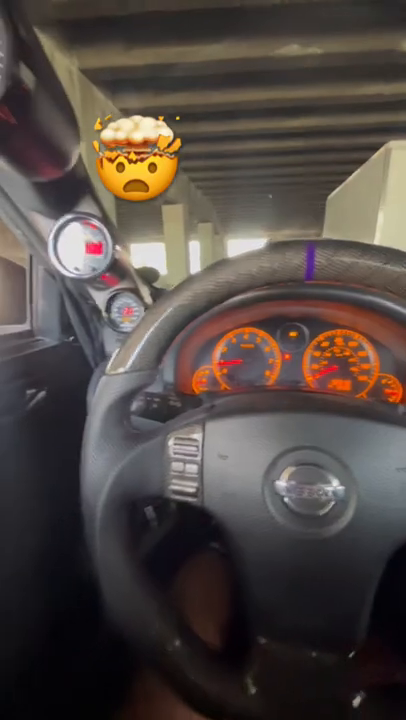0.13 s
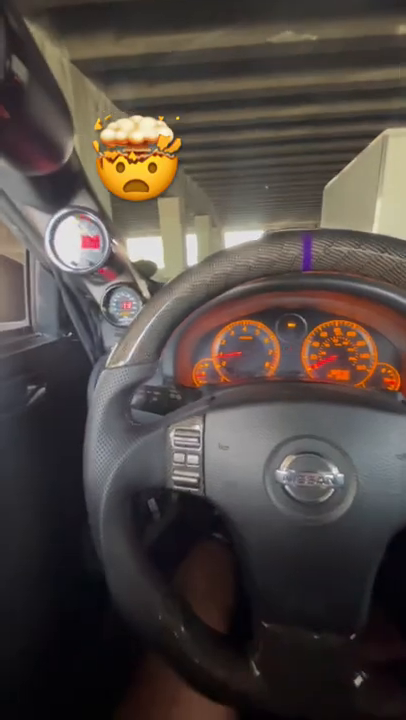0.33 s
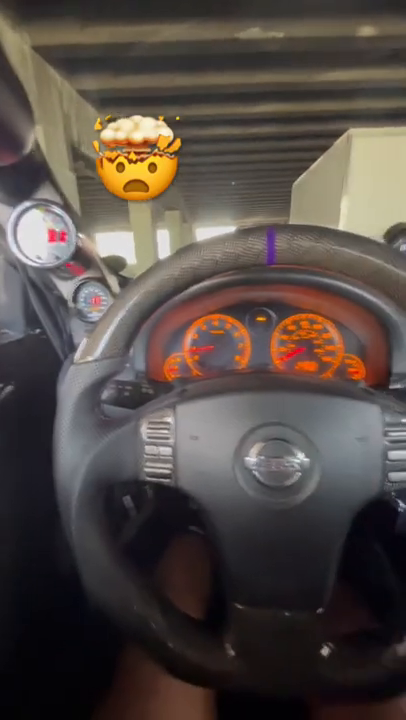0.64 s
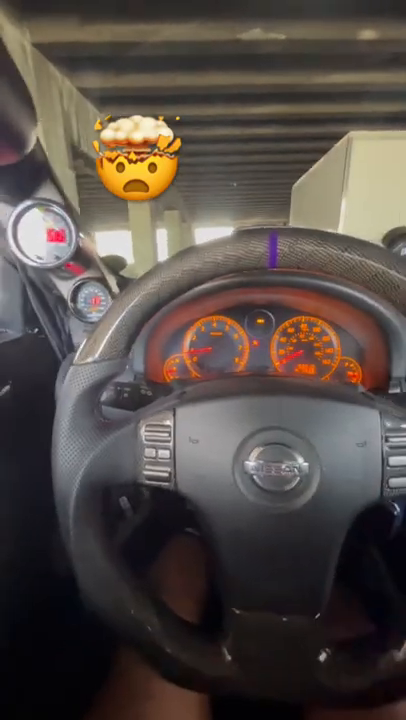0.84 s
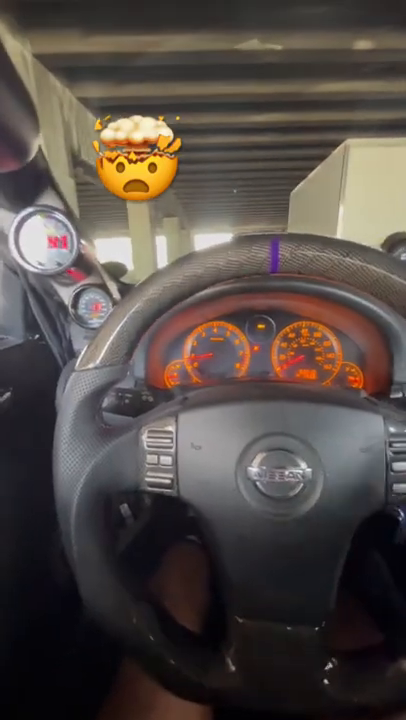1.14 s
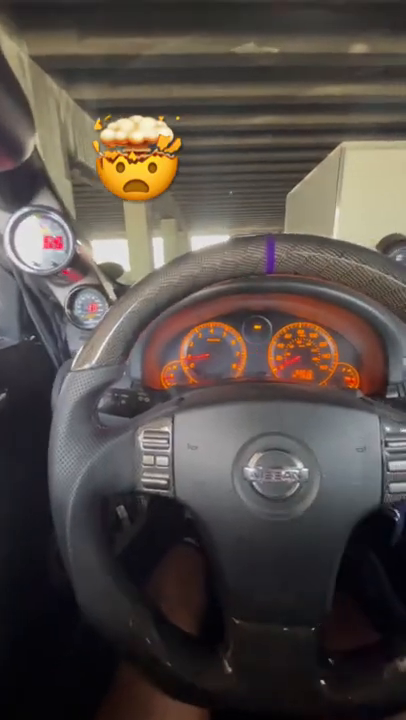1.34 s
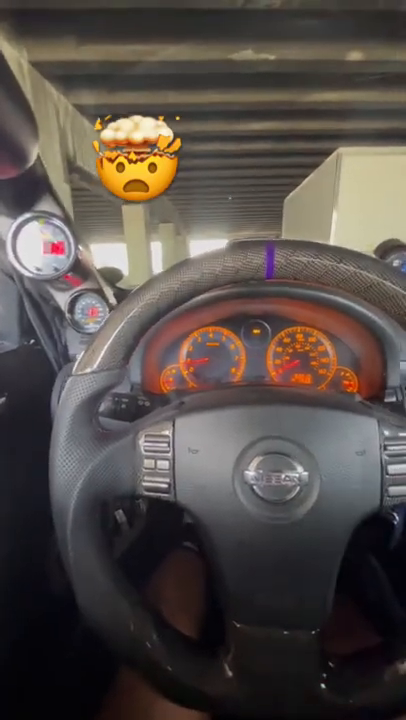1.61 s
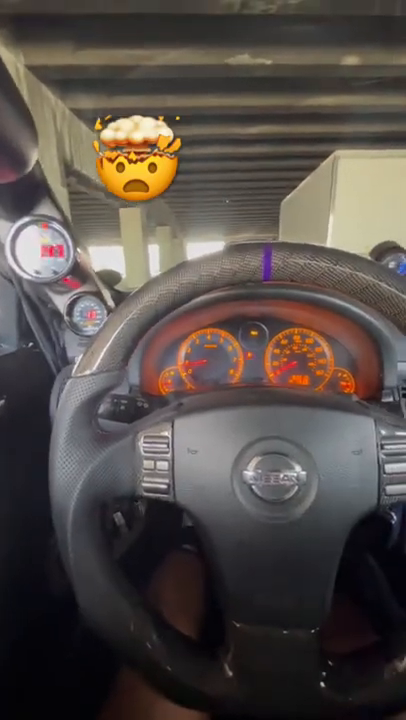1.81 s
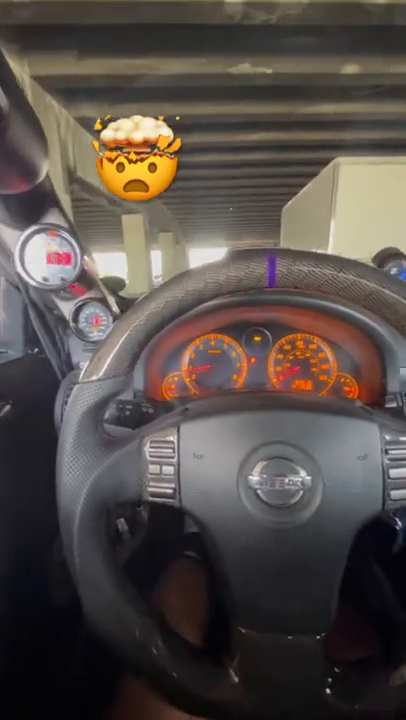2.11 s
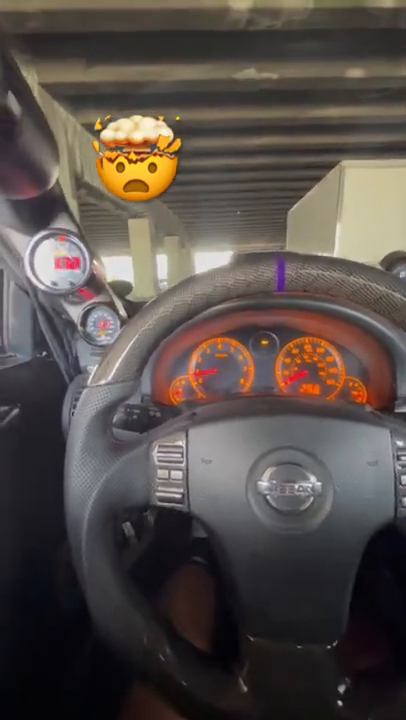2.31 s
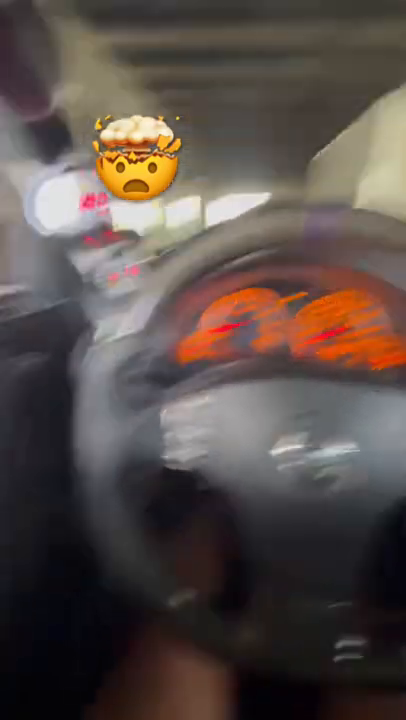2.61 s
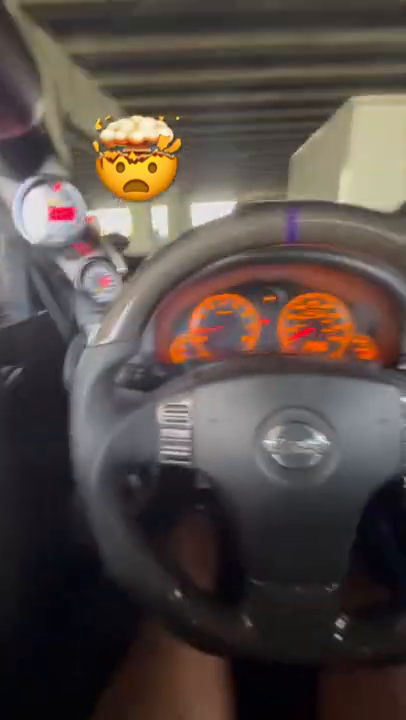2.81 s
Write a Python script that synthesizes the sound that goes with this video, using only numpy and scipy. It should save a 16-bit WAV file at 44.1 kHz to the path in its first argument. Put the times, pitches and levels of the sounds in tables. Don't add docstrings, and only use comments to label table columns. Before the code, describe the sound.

A car engine idles inside the cabin, cutting in abruptly at 0.04 seconds. Its low, resonant boom pulses unevenly, strongest near 0.6, 0.9 and 1.4, over another engine's even hum, throbbing panel rumble and soft fan roar. A barely audible bright puff leaks at 1.7. At 2.34 a turbo valve releases a brief whistling hiss, fading quickly as roar and a faint intake howl rise until the end.

```python
import sys
import numpy as np
from scipy import signal
from scipy.fft import rfft, irfft
from scipy.io import wavfile

SR = 44100
rng = np.random.default_rng(int(sys.argv[2]) if len(sys.argv) > 2 else 0)


def magnitude_from_level(level_db):
    exponent = np.asarray(level_db, float) / 20
    return 10 ** exponent


def wav_record(signal):
    frames = np.transpose(np.atleast_2d(signal))
    bounded = np.clip(frames, -1, 1)
    quanta = np.round(bounded * 32767).astype(np.int16)
    wavfile.write(sys.argv[1], SR, quanta)


N = 130095
T = np.arange(N) / SR
HZ = np.maximum(np.arange(N // 2 + 1) * SR / N, 1)

CRANK_HZ = 12.16
VALVE_OPEN_S, BURST_S = .03, 2.34

# start_s, pitch_hz, level_db
CABIN_BOOM = [(.05, 138, -19), (.17, 137, -16), (.3, 132, -24), (.4, 131, -18), (.52, 129.8, -22),
              (.575, 129.3, -11.5), (.68, 131, -26), (.74, 130, -15), (.92, 129.6, -13), (1.06, 130, -23),
              (1.2, 129, -17), (1.44, 128.9, -12.5), (1.58, 127.5, -25), (1.68, 128.5, -15),
              (1.84, 130, -21), (2.04, 130, -22), (2.1, 131.5, -16), (2.95, 132.7, -17)]


def rms_one(x):
    return x / np.sqrt(np.mean(x ** 2) + 1e-20)


def at_hz(points):
    hz, value = np.transpose(points)
    return np.interp(np.log(HZ), np.log(hz), value)


def in_time(rows):
    s, *columns = np.transpose(rows)
    return [np.interp(T, s, c) for c in columns]


def drift(rate_hz):
    pole = np.exp(-80 * np.pi * rate_hz / SR)
    steps = rng.standard_normal(N // 40 + 2002)
    slow = signal.lfilter([1], [1, -2 * pole, pole * pole], steps)[2000:]
    slow = rms_one(slow - slow.mean())
    return np.interp(np.arange(N) / 40, np.arange(len(slow)), slow)


def noise(gain):
    white = rng.standard_normal((2, N))
    return rms_one(irfft(rfft(white) * gain, N))


def colour(points):
    low_cut = 1 + (points[0][0] / HZ) ** 4
    high_cut = 1 + (HZ / points[-1][0]) ** 12
    return magnitude_from_level(at_hz(points)) / low_cut / high_cut


def peak(hz, width_hz):
    return 1 / (1 + (2 * (HZ - hz) / width_hz) ** 2)


def fade_in(start_s, rise_s):
    return np.clip((T - start_s) / rise_s, 0, 1)


def firing():
    return np.cumsum(in_time(CABIN_BOOM)[0] / 3) / SR


def orders(turns, table):
    total = 0
    for multiple, level_db in table:
        level = np.sqrt(2) * magnitude_from_level(level_db + 3 * np.tanh(drift(3)))
        phase = rng.uniform(0, 7) + .4 * drift(3)
        total = total + level * np.sin(2 * np.pi * multiple * turns + phase)
    return total


def own_engine():
    # firing_multiple, level_db
    own_orders = [(1, -39.5), (1.26, -40.5), (1.5, -46.5), (1.85, -38.5), (2, -29), (5, -42.5)]
    boom_level = np.sqrt(2) * magnitude_from_level(in_time(CABIN_BOOM)[1] + drift(8))
    return boom_level * np.sin(2 * np.pi * 3 * firing()) + orders(firing(), own_orders)


def even_engine():
    # crank_multiple, level_db
    even_orders = [(2.92, -31.5), (5, -35.5), (6, -25), (8, -37.5), (9, -38.5), (10, -31.5), (12, -34.5),
                   (14, -39), (16, -37), (18, -52), (21, -40.5)]
    return orders(CRANK_HZ * T, even_orders)


def throb():
    firing_throb_db = 3 * np.sin(2 * np.pi * firing())
    crank_throb_db = .5 * np.sin(2 * np.pi * CRANK_HZ * T)
    return firing_throb_db + crank_throb_db


def panel_rumble():
    # pitch_hz, density_db (per Hz)
    rumble_colour = [(26, -21.5), (34, -0.5), (70, -2), (103, -9.5), (135, -6), (160, -8), (260, -15.5),
                     (420, -23)]
    return magnitude_from_level(-24.5 + throb()) * noise(colour(rumble_colour))


def fan_roar():
    # pitch_hz, density_db (per Hz)
    roar_colour = [(260, -3), (420, 0.5), (800, -8), (1700, -11), (3100, -10.5), (4200, -15), (8500, -35.5),
                   (13800, -48)]
    # pitch_hz, width_hz, level_db
    resonances = [(965, 154, -43), (2616, 320, -45), (5870, 1500, -52), (369, 46, -46)]
    # start_s, swell_db
    load = [
        (0, 2),
        (.4, 0.5),
        (1.8, 0.5),
        (2.3, 2.5),
        (2.7, 3),
        (2.95, 2),
    ]
    air = magnitude_from_level(-35 + .58 * drift(4.4) + .6 * drift(25)) * noise(colour(roar_colour))
    for hz, width_hz, level_db in resonances:
        air = air + magnitude_from_level(level_db) * noise(peak(hz, width_hz))
    load_db, = in_time(load)
    return magnitude_from_level(load_db + .19 * throb()) * air


def whines():
    # pitch_hz, level_db
    tones = [(445.5, -48), (340.5, -51), (412, -57), (2310, -48.5), (1377, -43.5)]
    # start_s, rise_s
    starts = [(-.5, .1), (-.5, .1), (-.5, .1), (2.25, .1), (2.77, .1)]
    total = 0
    for (hz, level_db), (start_s, rise_s) in zip(tones, starts):
        level = np.sqrt(2) * magnitude_from_level(level_db + 3.4 * drift(9.9)) * fade_in(start_s, rise_s)
        total = total + level * np.sin(2 * np.pi * hz * T + .89 * drift(2.8))
    return total


def release(start_s, opening_s, level_db, fall_db_per_s):
    bleeding_s = np.maximum(T - start_s - opening_s - .07, 0)
    return magnitude_from_level(level_db - fall_db_per_s * bleeding_s) * fade_in(start_s, opening_s)


def valve_puff():
    # level_db, fall_db_per_s
    puff = (-59.5, 70)
    # pitch_hz, density_db (per Hz)
    puff_colour = [(3000, -25.5), (7000, -8.5), (10000, -3.5), (11700, 2.5), (13000, 0.5), (15500, -16.5)]
    return release(1.672, VALVE_OPEN_S, *puff) * noise(colour(puff_colour))


def valve_burst():
    # level_db, fall_db_per_s
    whoosh = (-36, 38)
    jet = (-45.5, 52)
    # pitch_hz, density_db (per Hz)
    whoosh_colour = [(1100, -20), (2200, -1.5), (2900, -0.5), (4000, -2.5), (7000, -10), (10000, -29)]
    jet_colour = [(3500, -11), (6000, 2), (9000, -1), (12500, -4.5), (14000, -9), (15600, -8)]
    ragged = release(BURST_S, VALVE_OPEN_S, *whoosh) * magnitude_from_level(1.2 * drift(30)) * noise(colour(whoosh_colour))
    bright = release(BURST_S, .07, *jet) * magnitude_from_level(drift(30)) * noise(colour(jet_colour))
    return ragged + bright


def valve_whistle():
    # pitch_hz, level_db
    whistle = (2720, -37)
    hz, level_db = whistle
    return release(BURST_S, VALVE_OPEN_S, level_db, 110) * noise(peak(hz, 330))


def intake_howl():
    # pitch_hz, width_hz, level_db
    howl = (1280, 310, -40)
    hz, width_hz, level_db = howl
    return magnitude_from_level(level_db) * fade_in(2.65, .25) * noise(peak(hz, width_hz))


def microphone_pair(field, tones):
    # pitch_hz, likeness (0-1)
    likeness = [(60, .99), (180, .99), (330, .85), (550, .25), (1200, .25), (2600, .55), (4200, .35),
                (8000, .8)]
    # pitch_hz, phase_rad
    phase_rad = [(300, .05), (1500, -.8), (2600, -2.3), (6300, -3.0), (8400, 0), (10300, 3.14),
                 (14500, 9.2), (15600, 11.5)]
    # pitch_hz, left_over_right_db
    balance_db = [(30, -.3), (70, -1.8), (140, -2), (380, 1), (950, 4.5), (2380, .7), (5980, -.3),
                  (15000, 0)]
    shared, own = rfft(field[0]), rfft(field[1])
    alike = np.clip(at_hz(likeness), 0, 1)
    middle = np.sqrt((1 + alike) / 2) * shared + rfft(tones)
    side = np.sqrt((1 - alike) / 2) * own
    turn = np.exp(.5j * at_hz(phase_rad))
    tilt = magnitude_from_level(.5 * at_hz(balance_db))
    left = (middle + side) * turn * tilt
    right = (middle - side) / turn / tilt
    return irfft([left, right], N)


def scene():
    tones = own_engine() + even_engine() + whines()
    field = panel_rumble() + fan_roar() + intake_howl()
    field = field + valve_puff() + valve_burst() + valve_whistle()
    return microphone_pair(field, tones)


def top_cut(x):
    return signal.sosfilt(signal.butter(12, 15710, fs=SR, output="sos"), x)


def record(dry):
    start_s = .03635
    return top_cut(dry * (T > start_s))


dry = scene()
out = record(dry)
wav_record(out)
```